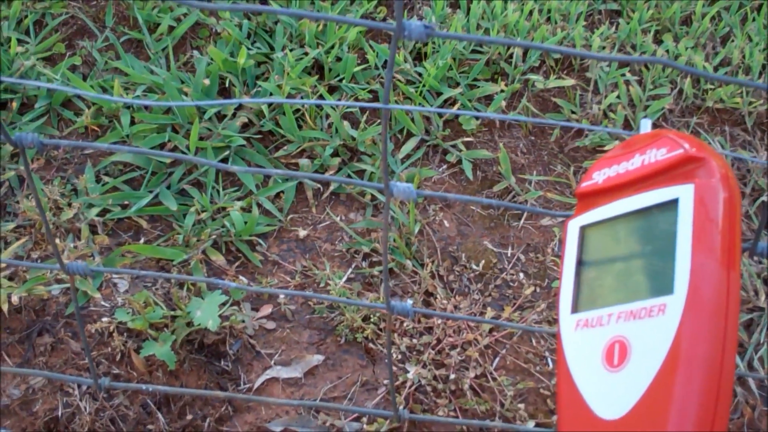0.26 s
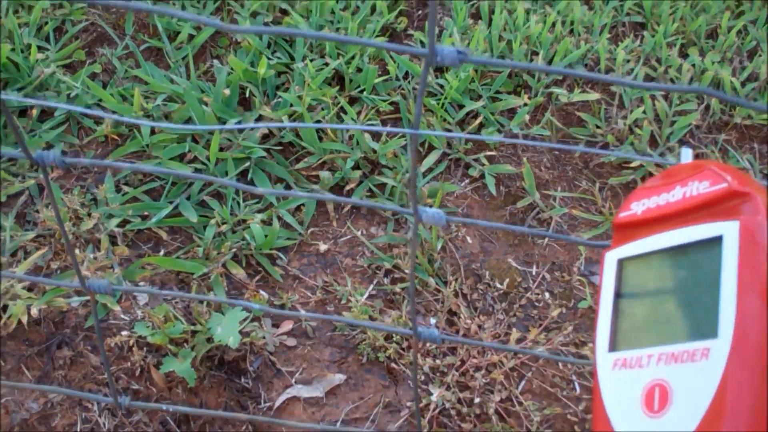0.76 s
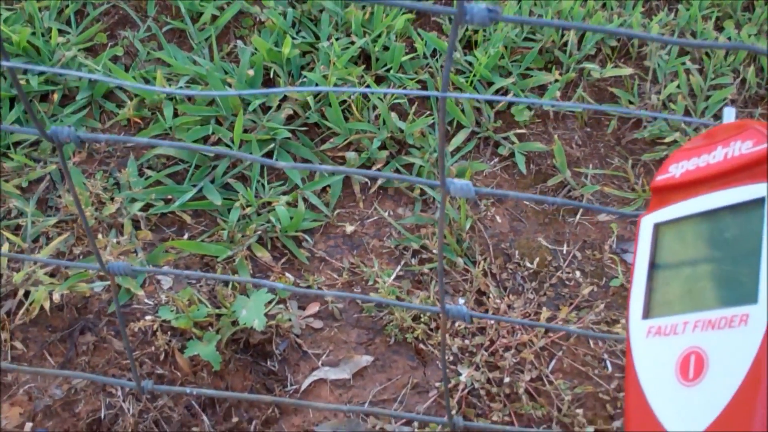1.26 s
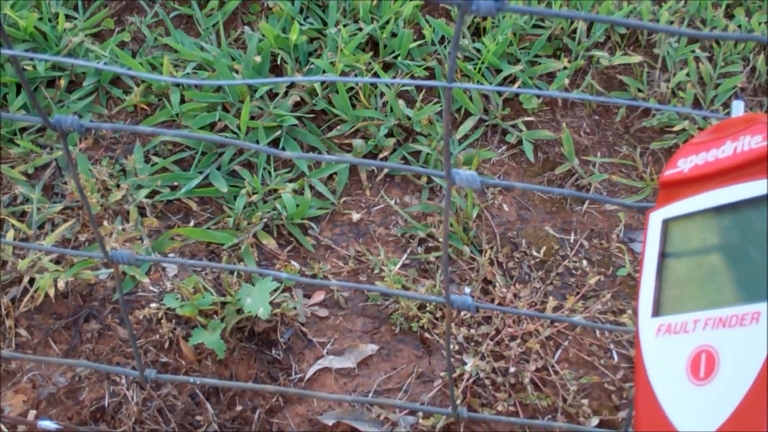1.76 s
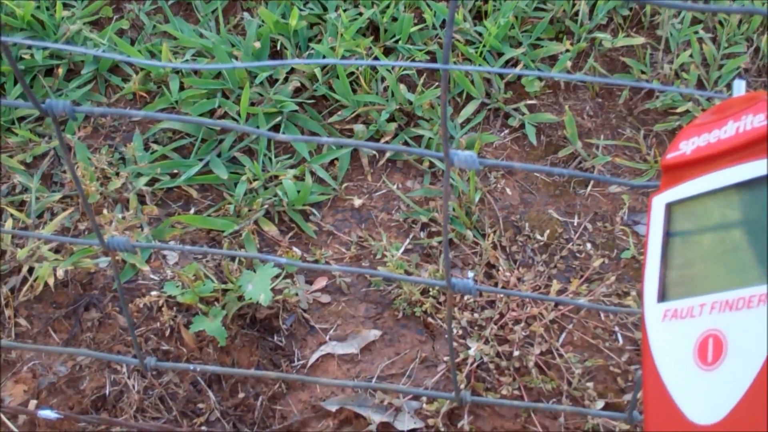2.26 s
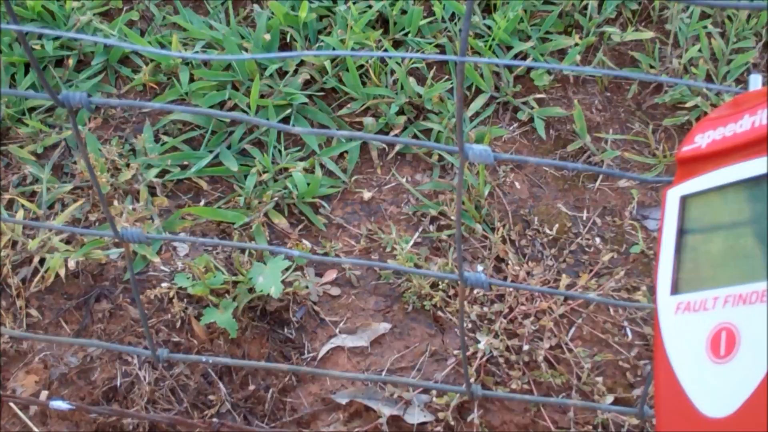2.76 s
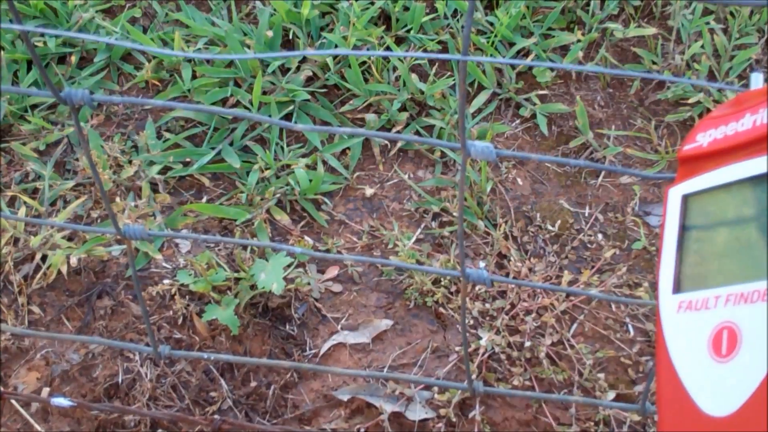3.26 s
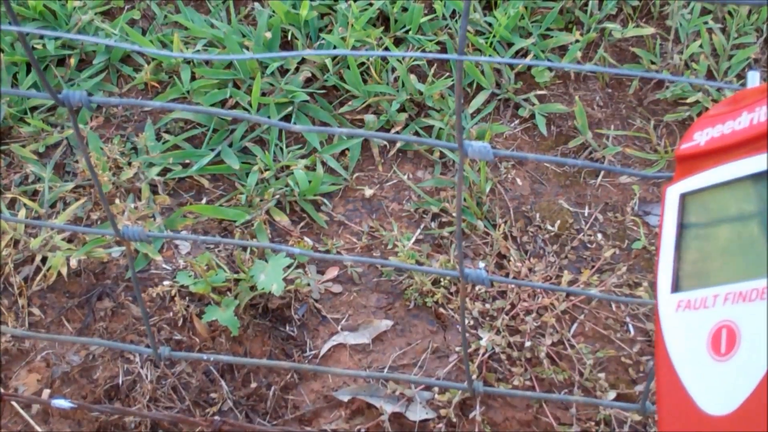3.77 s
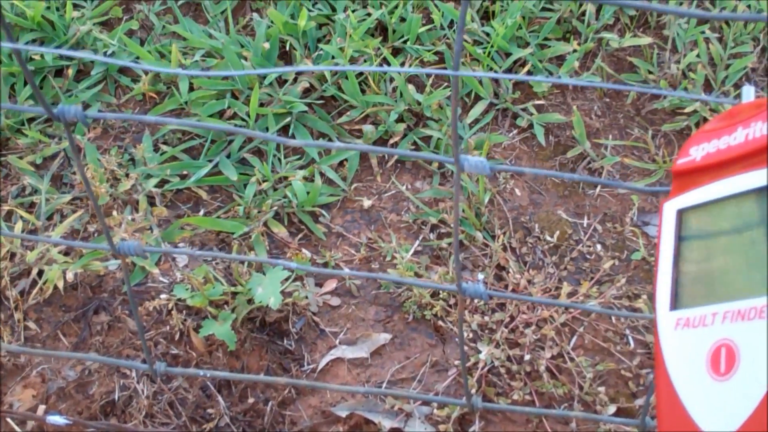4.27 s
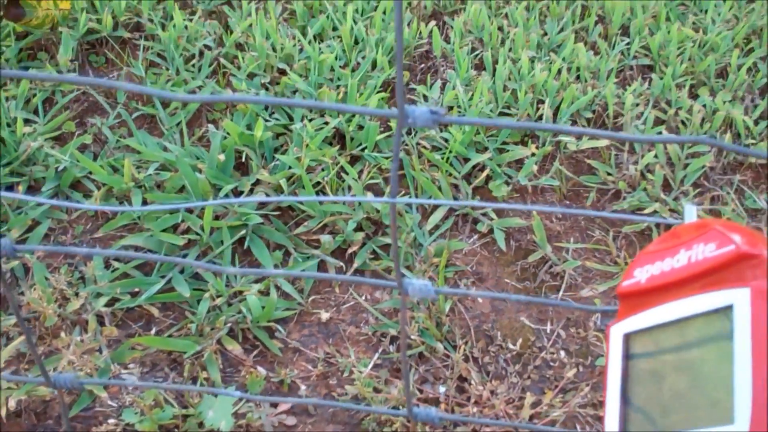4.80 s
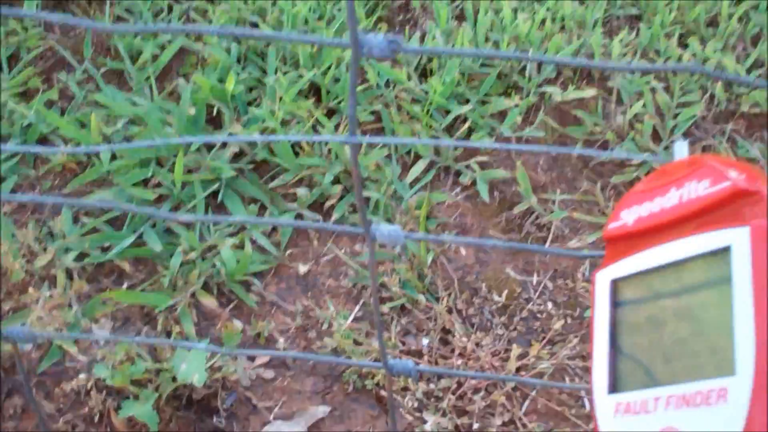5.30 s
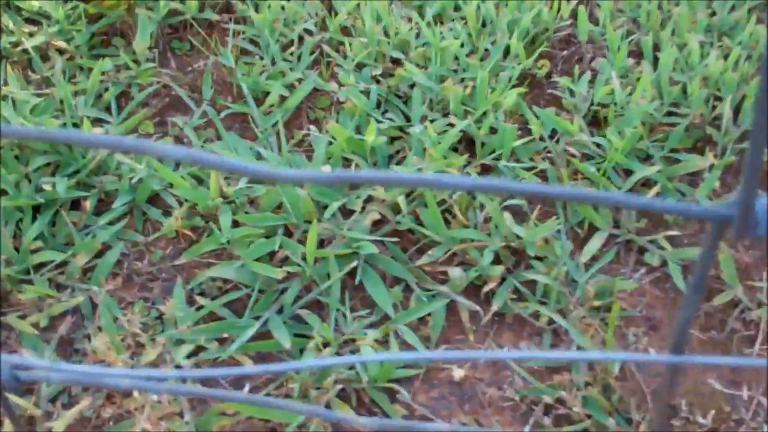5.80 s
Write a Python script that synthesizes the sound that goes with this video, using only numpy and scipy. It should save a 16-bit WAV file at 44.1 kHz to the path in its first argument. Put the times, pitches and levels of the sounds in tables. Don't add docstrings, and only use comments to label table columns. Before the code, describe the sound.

An open grassy place, heard close through a handheld stereo microphone. A continuous, very high cricket trill buzzes nearby, with other crickets chirping quickly in runs, a thin dense insect rasp on the right, soft leaf rustle and low distant traffic. At 0.26 s an electric spark snaps: a tiny, bright, hard click with a ground echo. A drier snap comes from the right at 1.84 s. At 3.41 s the crack fizzes longer and brings a heavy distorted pop; at 4.99 s another, to the left, has a strong echo and overload. After cracks the background ducks and quickly recovers. Small birds give quick rising chips at about 1.1, 1.7, 2.3, 3.0 and 3.6 s. Faint hoarse falling whistles come from far off around 2.2, 2.5, 3.8, 4.4 and 5.2 s. Light handling knocks touch the microphone at 4.4 s and 5.5 to 5.8 s.

```python
import sys
import numpy as np
from scipy import signal
from scipy.fft import rfft, irfft
from scipy.io import wavfile
from scipy.ndimage import uniform_filter1d

SR = 44100
rng = np.random.default_rng(int(sys.argv[2]) if len(sys.argv) > 2 else 0)


def volts(x):
    e = np.asarray(x, float) / 20
    return 10 ** e


def generate_wav(sig):
    pcm = np.round(np.clip(np.atleast_2d(sig).T, -1, 1) * 32767).astype(np.int16)
    wavfile.write(sys.argv[1], SR, pcm)


N = 266431
TIME = np.arange(N) / SR


def rms_one(x):
    return x / np.sqrt(np.mean(x ** 2) + 1e-20)


def joined(rows, s):
    first, *columns = np.transpose(rows)
    return [np.interp(s, first, c) for c in columns]


def at_hz(points, hz):
    points = np.array(points)
    return np.interp(np.log(hz), np.log(points[:, 0]), points[:, 1])


def left_right(pan_db):
    return volts(np.array([[pan_db / 2], [-pan_db / 2]]))


def drift(rate):
    r = np.exp(-80 * np.pi * rate / SR)
    white = rng.standard_normal(N // 40 + 2002)
    slow = rms_one(signal.lfilter([1], [1, -2 * r, r * r], white)[2000:])
    return np.interp(np.arange(N) / 40, np.arange(len(slow)), slow)


def resonate(x, hz, width_hz):
    r = np.exp(-np.pi * width_hz / SR)
    poles = [1, -2 * r * np.cos(2 * np.pi * hz / SR), r * r]
    return signal.lfilter([(1 - r * r) / 2, 0, (r * r - 1) / 2], poles, x)


def add(out, s, x, pan_db=0):
    i = max(round(s * SR), 0)
    x = x * left_right(pan_db)
    out[:, i:i + x.shape[1]] += x[:, :N - i]


# start in seconds, peak in dB, left-right difference in dB,
# 60 dB decay time of the fizz in seconds, ground echo in dB.
SPARK_CRACKS = [
    (0.2557, -9, 1, 0.0038, -1.5),
    (1.8351, -6.5, -5.5, 0.0019, -12),
    (3.4125, -8.5, -2.5, 0.019, -5.5),
    (4.9931, -9, 5.5, 0.0067, 8.5),
]
# frequency in Hz, density in dB per Hz.
CRACK_COLOUR = [(240, -46.5), (700, -29.5), (1900, -11.5), (4500, -12.5), (7000, -13), (11000, -1.5),
                (14000, -8), (16000, -42.5)]


def sparks():
    fizz_db, ground_echo_s = -7, .0015
    grass_db, grass_t60_s = -30, .025
    lead = 64
    out, t = np.zeros((2, N)), TIME[:2048]
    colour = volts(at_hz(CRACK_COLOUR, np.fft.rfftfreq(2048, 1 / SR) + 1))
    colour = colour / irfft(colour)[0]
    for s, peak_db, pan_db, t60, echo_db in SPARK_CRACKS:
        fizz, scatter = rng.standard_normal((2, 2, 2048))
        crack = (t == 0) + volts(fizz_db - 60 * t / t60) * fizz
        echo = volts(echo_db) * np.roll(crack, round(ground_echo_s * SR), axis=1)
        grass = volts(grass_db - 60 * t / grass_t60_s) * scatter
        crack = np.roll(crack + echo + grass, lead, axis=1)
        add(out, s - lead / SR, volts(peak_db) * irfft(rfft(crack) * colour), pan_db)
    return out


# start in seconds,
# length in seconds, fall time in seconds, height in full scales, saturation in full scales.
INDUCED_KICKS = [
    [(3.41393, .00058, .0004, 4.3, .72), (4.99308, .00058, .00075, 1.9, .5)],
    [(3.41393, .0002, .0002, -.85, .9), (3.4142, .00072, .00045, 3.0, .95), (4.9932, .001, .002, .33, .9)],
]


def kicks():
    rise_share = .2
    coupling_hz = (113, 60.3)
    out, t = np.zeros((2, N)), TIME[:3000]
    for side, rows, hz in zip(np.eye(2), INDUCED_KICKS, coupling_hz):
        for s, length, fall, height, ceiling in rows:
            rise = np.clip(t / (rise_share * fall), 0, 1)
            step = rise - np.clip((t - length) / fall, 0, 1)
            sag = signal.lfilter([1, -1], [1, -np.exp(-2 * np.pi * hz / SR)], height * step)
            add(out, s, np.outer(side, np.clip(sag, -.8, ceiling)))
    return out


# time in seconds, left in dB, right in dB.
TRILL_LEVEL = [(0.1, -39.5, -41), (0.2, -38, -42), (0.45, -36, -29), (0.7, -34, -37), (0.95, -33.5, -37),
               (1.3, -33.5, -39.5), (1.7, -38, -39), (2, -38, -37.5), (2.3, -36, -36.5), (2.8, -36, -37),
               (3.3, -35, -36.5), (4, -36.5, -37), (4.5, -35.5, -35.5), (4.9, -34, -33.5), (5.35, -36, -37),
               (5.6, -36, -35.5), (5.8, -38, -38), (6, -33, -35)]
# time in seconds, lag in radians.
RIGHT_LAG = [(0, 1.16), (1.1, 2.83), (2, 2.15), (4.5, 2.12), (5.4, 1.9), (6.1, 2.97)]
GROUND_ECHO_DB = [
    [-13],
    [-9],
]


def trill():
    strokes_per_s, echo_s = 75.2, .0029
    start, top, end, edge = .14, .55, .86, .06
    top_hz, rise_hz, fall_hz = 11180, 750, 1400
    swell_db, fade_db = 7, 9
    cycles = strokes_per_s * TIME
    stroke, part = cycles.astype(int), cycles % 1
    vary = rng.standard_normal((stroke.max() + 1, 4))[stroke].T
    before = np.clip((top - part) / (top - start), 0, 1)
    after = np.clip((part - top) / (end - top), 0, 1)
    hz = top_hz - rise_hz * before ** 1.5 - fall_hz * after ** 1.8
    phase = 2 * np.pi * np.cumsum(hz + 25 * vary[0]) / SR
    lag, = joined(RIGHT_LAG, TIME)
    ears = np.array([phase, phase + lag + 0.04 * vary[1]])
    gate = np.clip(np.minimum(part - start, end - part) / edge, 0, 1)
    shape_db = -swell_db * before - fade_db * after + vary[2:] + .8 * drift(150)
    tone = np.sin(ears) * gate * volts(shape_db)
    tone = tone + volts(np.array(GROUND_ECHO_DB)) * np.roll(tone, round(echo_s * SR), axis=1)
    blur = resonate(rng.standard_normal((2, N)), 10700, 380)
    blur = blur * (1 + .5 * np.cos(2 * np.pi * (cycles - .7)))
    level = volts(np.array(joined(TRILL_LEVEL, TIME)))
    return level * (rms_one(tone) + volts(-11.0) * rms_one(blur))


# pitch in Hz, chirp length in seconds,
# left-right difference in dB, spread of level in dB.
CRICKETS = [
    (9300, .046, -1, 1.2),
    (10000, .038, -2.5, 1.2),
    (9680, .028, -4, 1.2),
    (8750, .035, -3, 1.2),
]
CHIRP_GAP_S = (.172, .138, .112, .135)
# first chirp in seconds,
# last chirp in seconds, level in dB.
CHIRP_PHRASES = [
    [(.089, .089, -41), (.312, .826, -41), (1.05, 1.232, -41), (1.455, 2.63, -40), (2.88, 3.548, -40),
     (3.75, 3.95, -40), (4.19, 5.05, -41), (5.275, 5.275, -40), (5.5, 5.685, -40), (5.91, 5.91, -40)],
    [(.07, .768, -44), (.903, 1.96, -43), (2.1, 3.045, -42), (3.19, 3.9, -41), (4.044, 5.045, -42),
     (5.18, 5.446, -43), (5.59, 6.03, -42)],
    [(1.507, 1.614, -42), (2.204, 2.204, -44), (2.354, 2.772, -42), (3.138, 3.138, -44), (3.34, 3.34, -41),
     (3.625, 3.625, -41), (3.971, 4.2, -42), (4.405, 4.973, -40), (5.265, 5.265, -42), (5.402, 5.52, -39),
     (5.71, 5.71, -40)],
    [(3.08, 3.08, -49), (3.6, 3.6, -48), (4.25, 4.39, -50), (5.43, 5.57, -50), (5.843, 5.97, -48)],
]


def chirps():
    strokes_per_s, sweep_hz, sag_hz, clear_db = 140, 1100, 500, -2
    out, t = np.zeros((2, N)), TIME[:4500]
    beat = strokes_per_s * t % 1
    for (hz, length, pan_db, spread_db), gap, phrases in zip(CRICKETS, CHIRP_GAP_S, CHIRP_PHRASES):
        span = 1.35 * length
        swell = np.sin(np.pi * np.clip(t / span, 0, 1))
        swell = swell * (1 + .35 * np.cos(2 * np.pi * strokes_per_s * t))
        sweep = np.clip((10200 - hz) / 500, 0, 1)
        glide_hz = hz + sweep * (sweep_hz * (.5 - beat) + sag_hz * (.5 - t / span))
        whistle = np.sin(2 * np.pi * np.cumsum(glide_hz) / SR)
        clear = 2 * volts(clear_db) * np.sin(np.pi * beat) ** 2 * whistle
        wide = .35 if hz > 9600 else 1.6
        width_hz = 330 + .6 * max(10000 - hz, 0)
        for first, last, level_db in phrases:
            for s in np.linspace(first, last, round((last - first) / gap) + 1):
                teeth, own, mark = rng.standard_normal((3, 4500))
                scrape = (mark > .6) * np.array([teeth + wide * own, teeth - wide * own])
                wing = resonate(resonate(scrape, hz, width_hz), hz, 1.3 * width_hz)
                chirp = rms_one(rms_one(wing) + clear) * swell
                add(out, s - span / 2, volts(level_db - 3.0 + spread_db * own[0]) * chirp, pan_db)
    chorus = resonate(resonate(rng.standard_normal((2, N)), 10480, 1000), 9690, 2000)
    return out + volts(-50 + 2 * drift(25)) * rms_one(chorus)


def katydid():
    rasps_per_s, offset_cycles = 41.67, .11
    throb = .5 + .5 * np.cos(2 * np.pi * (rasps_per_s * TIME + offset_cycles))
    teeth = rng.standard_normal((2, N)) * (rng.random(N) < .25) * (1.8 + throb)
    wing = resonate(resonate(teeth, 14000, 1800), 13500, 2200)
    return volts(-47.5) * left_right(-8) * rms_one(wing)


# start in seconds, peak in dB, centre in Hz, width in Hz.
HANDLING_TICKS = [
    (4.443, -41, 350, 600),
    (5.515, -36, 8000, 6000),
    (5.645, -36, 12000, 6900),
    (5.808, -34, 1000, 2000),
    (5.8066, -37, 3500, 6000),
]


def ticks():
    out, t = np.zeros((2, N)), TIME[:900]
    for s, peak_db, hz, width_hz in HANDLING_TICKS:
        puff = rng.standard_normal(900) * volts(-60 * t / (0.005 + 8 / hz))
        puff = resonate(resonate(puff, hz, width_hz), hz, 2 * width_hz)
        add(out, s, volts(peak_db) * puff[None] / abs(puff).max())
    return out


# start in seconds, level in dB.
CHIP_CALLS = [
    (1.121, -53),
    (1.688, -47),
    (2.291, -48),
    (2.98, -45.5),
    (3.59, -46),
]
# time from the start in seconds, pitch in Hz, level in dB.
CHIP_NOTES = [(0, 5700, -28), (.008, 7000, -3), (.02, 7500, -2), (.027, 7500, -20), (.03, 6700, -17),
              (.037, 7400, -19), (.046, 7600, 4.5), (.055, 7500, -18)]
# start in seconds, length in seconds,
# first pitch in Hz, level in dB.
FAR_WHISTLES = [
    (2.15, .25, 2880, -59),
    (2.48, .12, 2820, -59),
    (3.81, .37, 3090, -50),
    (4.43, .37, 3070, -54),
    (5.22, .36, 3060, -54),
]


def birds():
    out, t = np.zeros((2, N)), TIME[:8000]
    hz, level_db = joined(CHIP_NOTES, t)
    for s, call_db in CHIP_CALLS:
        rough_hz = 900 * resonate(rng.standard_normal(8000), 300, 550)
        note = np.sin(2 * np.pi * np.cumsum(hz + rough_hz) / SR)
        note = note * volts(level_db - 7.0) * (t < CHIP_NOTES[-1][0])
        echo = rms_one(resonate(rng.standard_normal((2, 8000)), 7000, 2200))
        echo = echo * volts(1.5 - 60 * t / .6) * np.minimum(t / .02, 1)
        add(out, s, volts(call_db) * (note + echo), -3)

    fall_hz_per_s2, attack_s, release_s = 2400, .06, .15
    waver, flutter = drift(80), drift(50)
    for s, length, first_hz, call_db in FAR_WHISTLES:
        part = slice(round(s * SR), round((s + length) * SR))
        t = TIME[part] - s
        hz = first_hz - fall_hz_per_s2 * t ** 2
        swell = np.clip(np.minimum(t / attack_s, (length - t) / release_s), 0, 1)
        phase = 2 * np.pi * np.cumsum(hz + 40 * waver[part]) / SR
        voice = np.sin(phase) * [[.8], [1.2]] + np.sin(2 * phase) * [[.15], [.45]]
        out[:, part] += voice * swell * volts(call_db - 4.5 + 3 * flutter[part])
    return out


# frequency in Hz, density in dB per Hz.
AIR_COLOUR = [(15, -47), (25, -20.5), (60, -6.5), (120, 0), (200, -10), (368, -14.5), (650, -21),
              (1130, -13.5), (2000, -16), (3630, -19.5), (6020, -23), (8510, -21.5), (12000, -18.5),
              (15000, -29)]
# frequency in Hz, correlation from -1 to 1.
AIR_LIKENESS = [(60, 0.92), (130, 0.98), (290, 0.66), (630, 0.54), (1380, 0.56), (3030, -0.22),
                (6650, 0.095), (14600, -0.76)]
# frequency in Hz, left-right difference in dB.
AIR_TILT = [(60, -2), (240, -1.5), (930, -2), (3690, -1), (14600, 1.5)]
# time in seconds, level in dB.
LEAF_RUSTLE = [
    (0, -51.5),
    (2, -54),
    (3.9, -55),
    (4.5, -53.5),
    (6.1, -55),
]


def meadow():
    rumble_db = -57
    rustle_db, = joined(LEAF_RUSTLE, TIME)
    out, together = 0, drift(2.5)
    edges = 28 * 2 ** np.arange(0, 9.4, .5)
    white = rng.standard_normal((2, 2, N))
    for k, (low, high) in enumerate(zip(edges, edges[1:])):
        band = signal.butter(2, [low, high], "band", fs=SR, output="sos")
        mid, side = signal.sosfilt(band, white[k % 2])
        hz = np.sqrt(low * high)
        alike = np.clip(at_hz(AIR_LIKENESS, hz), -1, 1)
        stereo = np.sqrt(1 + alike) * mid + np.sqrt(1 - alike) * side * [[1], [-1]]
        level_db = rumble_db if hz < 400 else rustle_db
        gain = volts(at_hz(AIR_COLOUR, hz) + level_db + 22 + 0.5 * together + 1.5 * drift(6.9))
        out = out + gain * stereo * left_right(at_hz(AIR_TILT, hz))
    return out


def scene():
    return sparks() + trill() + chirps() + katydid() + ticks() + birds() + meadow()


def gain_control(sensed, threshold_db, release_db_per_s, attack_s):
    power = uniform_filter1d(np.mean(sensed ** 2, axis=0), size=441, origin=220)
    level_db = 10 * np.log10(abs(power) + 1e-12)
    ramp = release_db_per_s * TIME
    cut_db = np.maximum.accumulate(np.maximum(level_db - threshold_db, 0) + ramp) - ramp
    r = np.exp(-1 / (attack_s * SR))
    return volts(-signal.lfilter([1 - r], [1, -r], cut_db))


# start in seconds, end in seconds, share merged.
SHARED_TREBLE = [
    (.295, .5, .9),
    (.5, .63, .55),
    (2.472, 2.631, .85),
    (3.43, 3.875, .95),
    (5.01, 5.25, .9),
]


def one_treble(x, low_hz, high_hz):
    band = signal.butter(6, [low_hz, high_hz], "band", fs=SR, output="sos")
    treble = signal.sosfiltfilt(band, x)
    share = 0
    for start, end, part in SHARED_TREBLE:
        opened = np.clip((TIME - start) / 0.015, 0, 1)
        closed = np.clip((TIME - end) / 0.0046, 0, 1)
        share = share + np.clip(part, 0, 1) * (opened - closed)
    return x + share * (treble[0] - treble)


def low_pass(x, stop_db, hz):
    return signal.sosfiltfilt(signal.cheby2(12, stop_db, hz, fs=SR, output="sos"), x)


def top_cut(x):
    return signal.sosfilt(signal.butter(12, 15170, fs=SR, output="sos"), x)


def record(dry):
    blocking_hz, hiss_db = 2.4, -67
    induced = kicks()
    dry = dry - .6 * resonate(dry, 11950, 800)
    gain = gain_control(dry + induced, threshold_db=-27, release_db_per_s=45, attack_s=0.0033)
    x = dry * gain + induced
    x = signal.lfilter([1, -1], [1, -np.exp(-2 * np.pi * blocking_hz / SR)], x)
    x = x + volts(hiss_db) * rng.standard_normal((2, N))
    x = one_treble(x, low_hz=5000, high_hz=12600)
    x = low_pass(x, 40, 15400)
    top = low_pass(x, 30, 14500)
    loud = np.clip(uniform_filter1d(abs(x).max(axis=0), size=600) / .04 - 1, 0, 1)
    mix = np.clip(top + loud * (x - top), -1, 1)
    return top_cut(mix)


dry = scene()
out = record(dry)
generate_wav(out)
```